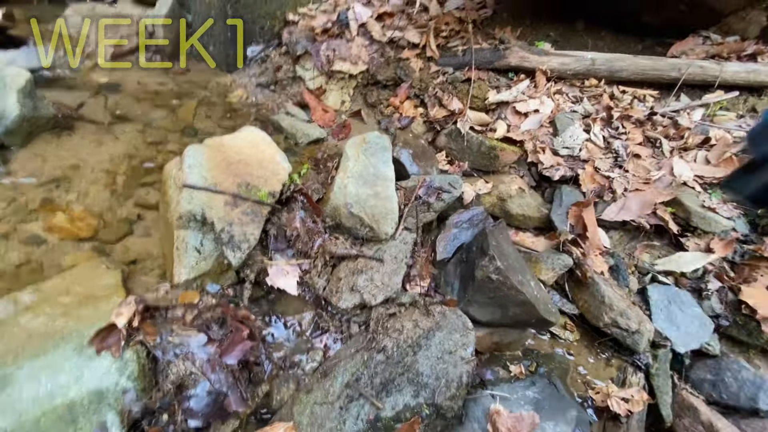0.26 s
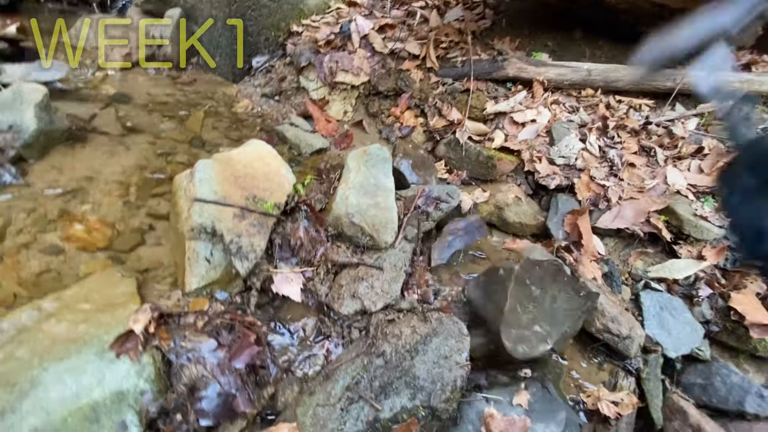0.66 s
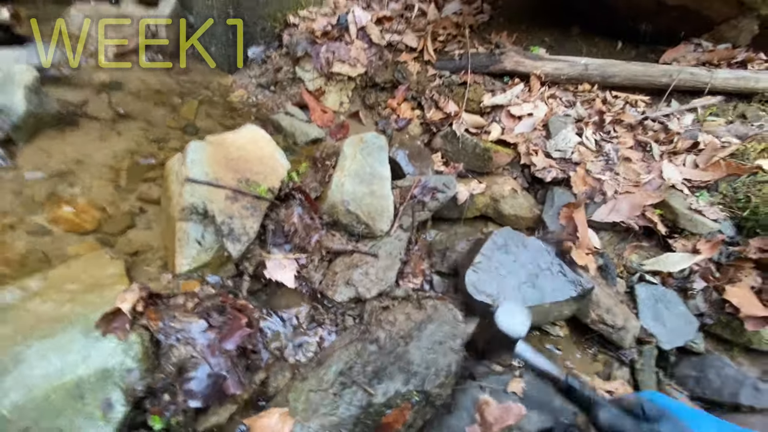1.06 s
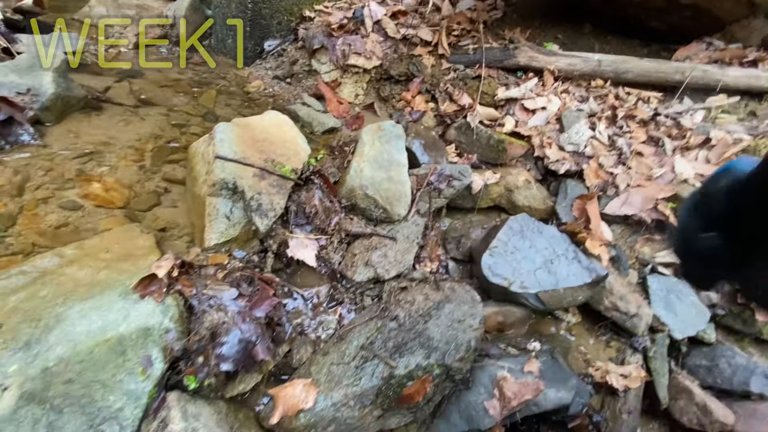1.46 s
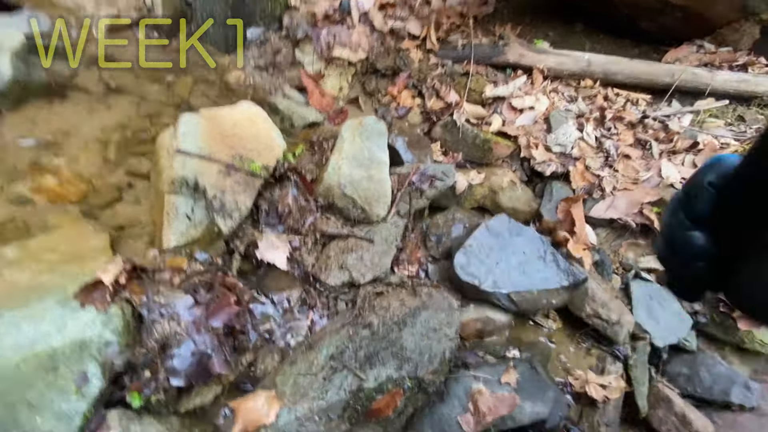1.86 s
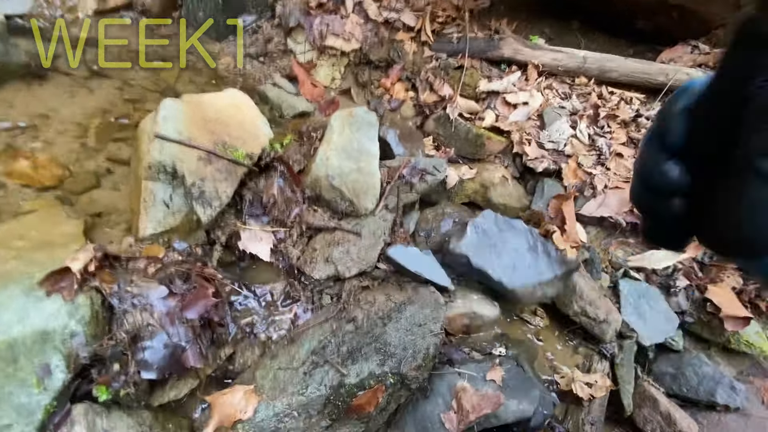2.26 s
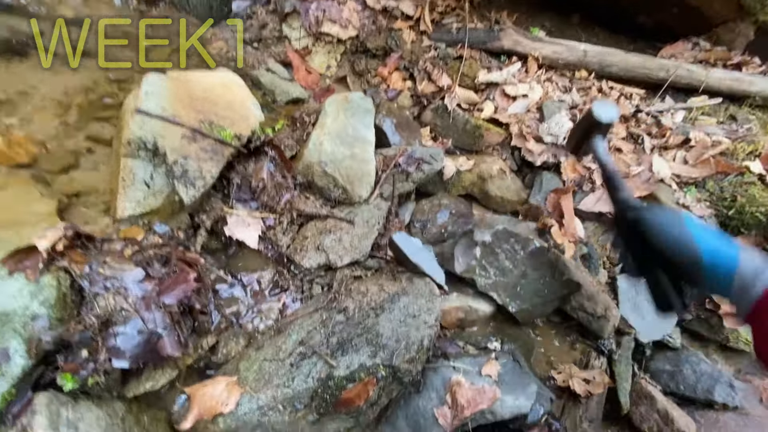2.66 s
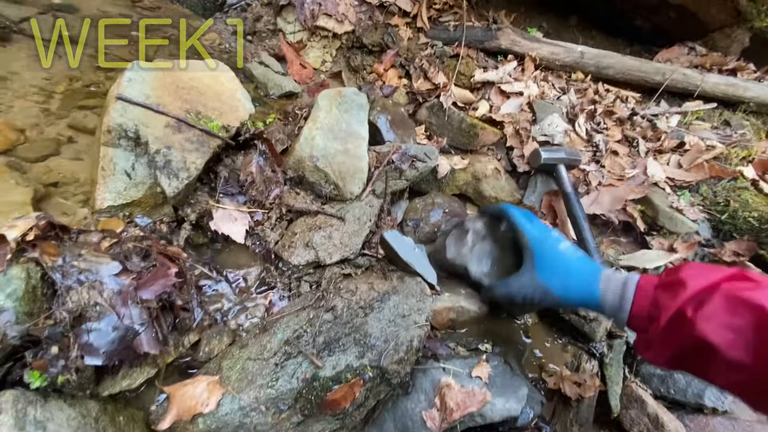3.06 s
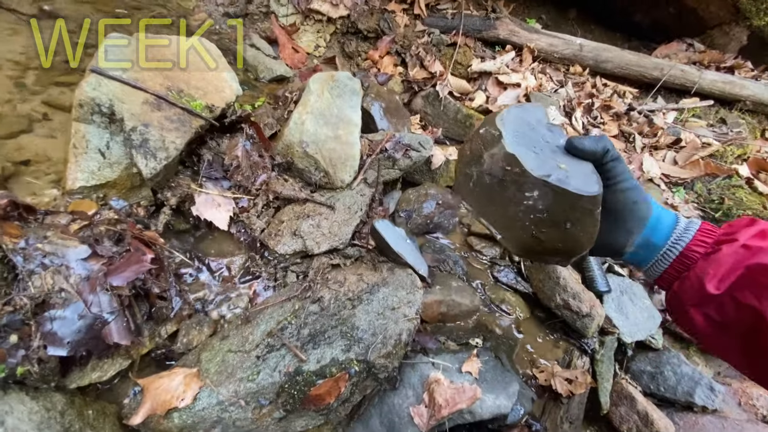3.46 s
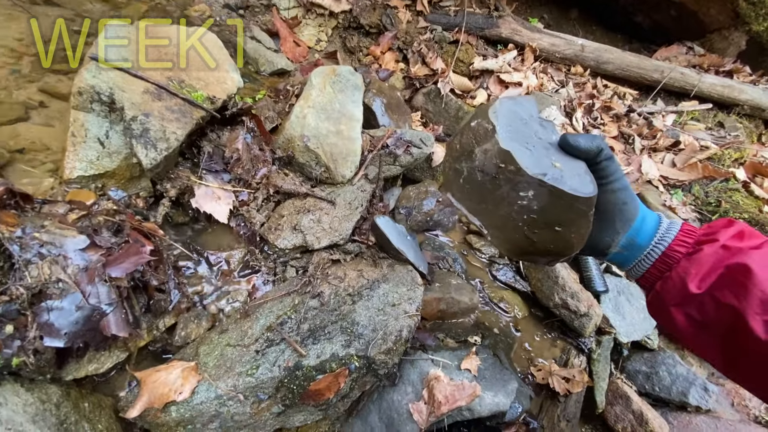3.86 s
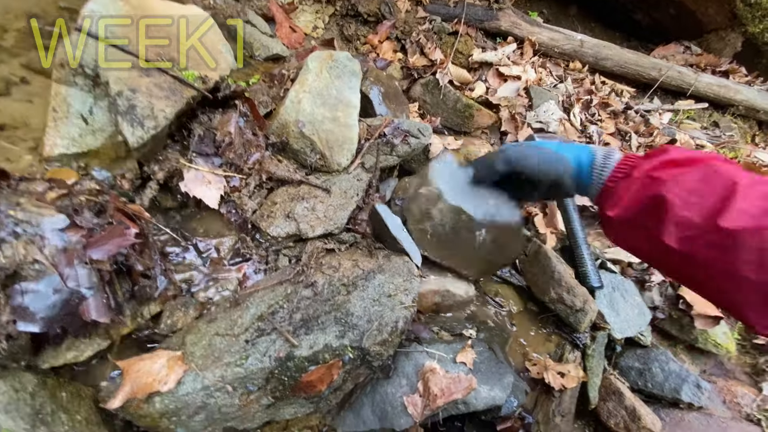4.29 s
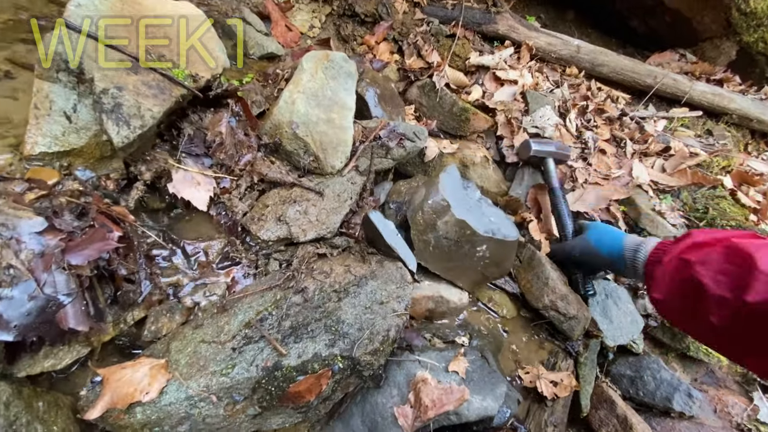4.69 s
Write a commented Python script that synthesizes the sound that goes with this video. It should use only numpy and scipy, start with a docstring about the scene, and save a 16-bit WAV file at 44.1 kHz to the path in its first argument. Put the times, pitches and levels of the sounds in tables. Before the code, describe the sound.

Close outdoor stereo recording of rock splitting: short, dry, distorted hammer cracks with brief steel ring, each followed by stone clacks and small chips rattling. A thin stream hisses and drips throughout, with soft low air rumble and rubbing on the microphone. Bright clinks follow the last blow, then a lull, then the heavy stone lands in a quick cluster of knocks.

```python
"""On the stony bank of a small stream, a steel hammer splits hard rocks close to a stereo microphone that overloads.
Blows are crushing noise through the block's resonances; knocks, clinks and the singing hammer are damped modes.
Grit and the snaps of some clinks are swells of spiky noise. The stream is patchy hiss with bubbles and drips,
tones whose pitch climbs. Low, lumpy noise makes the breeze and the rubs on the microphone; the bank answers
with a short noise tail."""
import sys
import numpy as np
from scipy import signal
from scipy.fft import rfft, irfft, next_fast_len
from scipy.io import wavfile
from scipy.ndimage import uniform_filter1d, map_coordinates

SR = 44100
rng = np.random.default_rng(int(sys.argv[2]) if len(sys.argv) > 2 else 0)


def unload_audio(sound):
    """Save the sound as a 16-bit wav file, at the path given as the first command line argument."""
    columns = np.transpose(np.atleast_2d(sound))
    # keep every value between -1 and 1, then stretch to whole-number steps
    steps = np.round(np.clip(columns, -1, 1) * 32767)
    wavfile.write(sys.argv[1], SR, steps.astype(np.int16))


def undo_db(level):
    """Turn decibels back into plain size, where 20 dB means ten times bigger."""
    steps = np.asarray(level, float) / 20
    return 10 ** steps


N = 213179  # length in samples

# Air buffeting the microphone ports: start_s, level_db
BREEZE_LEVEL = [(0, -59), (.5, -64), (1.7, -59.5), (3.1, -58.5), (4.1, -66.5), (4.4, -58), (4.83, -60.5)]
# A sleeve or strap drags on the microphone body: start_s, level_db, length_s
RUBS = [(1.411, -34.5, 0.069), (1.506, -39, 0.047), (2.97, -44, 0.045), (3.037, -46, 0.044),
        (3.065, -44.5, 0.023)]
# Colour of breeze and rubs: freq_hz, relative level_db
RUMBLE_COLOUR = [(21, -29), (35, -2.5), (102, -9), (134, -5.5), (168, -8), (323, -17.5), (400, -33),
                 (520, -66.5), (880, -120)]
LUMPS_DB = 3  # depth of the rumble's quick lumps

# Level of the trickle before its stirring and flutter: start_s, level_db
WATER_LEVEL = [(0, -49.5), (.2, -52), (.38, -46), (.9, -50), (1.5, -49.5), (2, -50), (2.3, -46),
               (2.45, -49), (2.8, -51.5), (3.3, -52.5), (3.7, -54), (4.1, -53), (4.28, -51), (4.83, -50.5)]
# Colour of the trickle's hiss: freq_hz, relative level_db
TRICKLE_COLOUR = [(150, -49), (250, -17.5), (413, -2), (694, -5), (885, -1.5), (1510, -3.5), (1900, -1.5),
                  (2330, -4), (2920, -2), (10900, -13), (15700, -20.5)]
# Likeness of left and right in the noise of water and air: freq_hz, likeness (0 to 1)
SIDE_LIKENESS = [(100, 0.07), (1000, 0.13), (8000, 0.033)]
# The side the water leans to: freq_hz, left_over_right_db
WATER_LEAN = [(60, -12), (180, -13), (550, 1.5), (1650, 4), (4970, 2.5), (15000, 1.5)]
# A jolt stirs water and gravel, mostly a swell, once a dip: start_s, change_db at its peak
STIRS = [(.4, 2), (1.03, 8), (1.601, 7), (2.02, -0.5), (2.51, 3.5), (2.85, 6), (4.33, 3)]
STIR_S = 0.054  # time to the peak of a change, which then settles
# The clearest drips: start_s, level_db, pitch_hz before the climb
DRIPS = [(0.067, -38, 1750), (0.2863, -37.5, 2370), (0.3306, -36, 2920), (1.512, -29, 3210),
         (2.2256, -32.5, 3430), (2.2952, -37, 3800), (3.2189, -38.5, 2540), (3.2987, -41, 7430),
         (3.7676, -33, 4380), (3.8138, -42, 3000), (3.9973, -36.5, 2010), (4.0466, -42.5, 1910),
         (4.219, -29, 3530), (4.6323, -35, 3620), (4.684, -36, 2700)]
DRIP_SIDE_DB, FAINT_DRIP_DB = 15, -40  # left over right of the dripping ledge; loudest chance drip

# Bursts of scattering grit, and the noisy snaps of the clinks at 1.03 and 2.06 s:
# start_s, level_db under the swell, length_s, tilt_db per octave
GRIT_BURSTS = [(0, -42, 0.13, -5.5), (0.403, -33.5, 0.094, -7.5), (0.799, -34, 0.022, -4.5),
               (1.032, -13.5, 0.0071, -12), (1.055, -26, 0.017, -4.5), (1.075, -28, 0.021, 0.5),
               (1.613, -25.5, 0.025, -6.5), (1.719, -27, 0.015, 1.5), (1.89, -43, 0.051, -1),
               (2.037, -37.5, 0.14, -3.5), (2.0585, -16, 0.0061, 1), (2.479, -25.5, 0.041, -5.5),
               (2.51, -23, 0.013, 10), (2.674, -45.5, 0.075, -1), (2.856, -39.5, 0.026, -30),
               (3.096, -42, 0.031, -6), (3.178, -36.5, 0.016, -3.8), (3.468, -50, .012, -1),
               (3.544, -43.5, .015, -4.5), (3.822, -45.5, 0.012, -3.5), (4.203, -46.5, 0.24, -3.5),
               (4.282, -28, 0.025, -6.5), (4.322, -23.5, .01, -9), (4.344, -30, .025, -13)]

# Flakes and hammer head touch stone: start_s, level_db, pitch_hz, t60_s, left_over_right_db
CLINKS = [(0.0557, -29.5, 4100, 0.031, 10), (.4618, -19, 3500, .02, 0), (0.7639, -28, 4500, 0.018, -4.5),
          (0.799, -30, 5200, 0.007, -0.5), (0.842, -35, 5400, 0.005, 21), (1.0495, -24, 3970, 0.0085, 10.5),
          (1.0563, -23, 1500, 0.025, -1.5), (1.0705, -22, 4250, 0.01, -4.5),
          (1.1072, -32.5, 4500, 0.0057, 1.5), (1.796, -25, 4730, 0.0058, -2.5),
          (2.0417, -7.5, 1740, 0.013, 7), (2.0444, -10.5, 3500, 0.017, 4.5), (2.0511, -9.5, 2070, 0.013, 9),
          (2.0585, -3.5, 3500, 0.012, -1.5), (2.072, -22, 1310, .03, -1), (2.167, -25, 1780, 0.017, -3),
          (2.4855, -19, 1650, 0.023, 2), (2.501, -20, 3500, 0.021, -2), (2.5097, -7.5, 1200, 0.02, 6),
          (2.5121, -6, 1522, 0.018, -1.5), (2.5301, -25, 3950, 0.013, 10), (2.8479, -11.5, 1488, 0.037, -7),
          (2.8555, -29.5, 1197, 0.056, 8), (2.9453, -29, 1280, 0.033, -7), (3.1792, -40.5, 911, 0.015, 12),
          (3.8961, -35.5, 2780, 0.023, 11), (4.2841, -18.5, 1500, 0.021, 1.5)]
# Modes of a flake: freq_hz, relative level_db
FLAKE_MODES = [(700, -7.5), (1150, 4.5), (1500, -3), (1850, 0), (2400, 1), (3000, -1), (3400, 1.5),
               (4200, 7.5), (4900, 10.5)]
SNAP_DB = -10.5  # snap of a clink under its ring
# The hammer head rings when it skids: start_s, level_db
SKIDS = [(2.0405, -11.5), (2.0505, -16.5), (2.0588, -8.5), (2.0862, -26.5)]
# Modes of the skidding steel: freq_hz, relative level_db, t60_s
STEEL_MODES = [(11150, 3, .025), (10370, -1, .03), (11180, 8, 0.016), (12960, -4.5, .02)]

# Low mode of the handle, then high mode of the head: freq_hz, t60_s
HAMMER_MODES = [(690, 0.087), (3280, 0.019)]
# Jolts that set the hammer singing: start_s, handle_db, head_db, ring_times (a loose hammer rings longer)
JOLTS = [(.995, -17.5, -41, 1.4), (1.0258, -38.5, -6, 1.1), (1.0302, -39.5, -4, .9),
         (1.605, -15.5, -38, 1.1), (2.025, -17, -41, .7), (2.483, -21, -46.5, .95), (2.514, -18, -45.5, .6),
         (2.848, -62, -15, 1.05), (2.876, -41.5, -52, 2.4)]

# The block knocks on its bed: start_s, level_db, strongest_hz, t60_s, upper_modes_db
KNOCKS = [(0.0211, -21.5, 425, 0.08, -49), (0.04, -14, 870, 0.016, -30), (0.054, -25, 990, 0.036, -16),
          (0.0863, -33.5, 600, 0.02, -23), (0.115, -37, 800, 0.018, -15), (0.4532, -4.5, 740, 0.014, -16.5),
          (0.5324, -17.5, 920, 0.024, 2), (0.5354, -2.5, 860, 0.03, -24), (.595, -24.5, 1120, 0.021, -15),
          (0.6239, -30, 1090, 0.032, -12), (.634, -30, 1180, 0.042, -16), (0.7368, -17.5, 990, 0.024, -15),
          (0.812, -28.5, 1130, 0.063, -9), (0.8179, -15.5, 1150, 0.023, -1), (0.895, -31, 1080, 0.015, -8),
          (1.1263, -16, 694, 0.018, -21), (1.6348, -8.5, 1040, 0.023, -8.5), (1.7618, 0, 783, 0.022, -25.5),
          (1.806, -29.5, 1300, 0.061, -17), (1.714, -34, 453, 0.02, -19), (2.127, -28.5, 450, 0.023, -16),
          (2.271, -35.5, 417, 0.019, -30), (2.339, -4, 640, 0.017, -18.5), (2.35, -24, 603, 0.011, -6),
          (2.374, -32, 888, 0.093, -6), (2.396, -28, 726, 0.04, -18), (2.544, -22, 590, 0.027, -12),
          (2.8711, -18, 860, 0.02, 3), (3.109, -36, 1090, 0.04, -21), (4.296, -21, 600, 0.057, -13),
          (4.325, -1, 1250, 0.012, -3), (4.3372, 8, 880, 0.016, -13), (4.4359, -6.5, 744, 0.021, -21.5)]
# Modes of the block resting on its bed: freq_hz, level_db, left_over_right_db, share of the knock's t60
BED_MODES = [(451, -3, 4.5, 1.5), (600, 1, 14, 1), (680.6, 3.5, -2.5, 0.98), (860, 9, -5, 0.69),
             (1007, 3.5, -19.5, 0.55), (1239, -4.5, -2, 1.52), (1587, 9, -0.5, 0.75), (2160, 3.5, 0.5, 0.8),
             (2640, 4.5, 3, 0.39), (3500, -2.5, -1.5, 0.42), (4350, -5, 12.5, 0.48)]
# A blow or the block's full weight pushes the ground: start_s, level_db
LANDINGS = [(0.116, -45), (.396, -19.5), (0.4526, -27), (0.537, -45), (0.7363, -46.5), (0.816, -40),
            (0.984, -21), (1.028, -23), (1.1255, -34), (1.595, -32), (2.016, -13), (2.8715, -30.5),
            (4.296, -34.5), (4.322, -19.5), (4.336, -14.5)]
KNOCK_CRACK_DB, KNOCK_PUSH_DB = -17, -32  # snap over the upper modes; push on the ground under any knock

# Hammer blows, and at 1.03 s a brief sharp clink of the head, each with its own favoured pitch:
# start_s, level_db, crush_s, treble_db, favoured_hz
BLOWS = [(0.3947, -0.5, 0.015, -21.5, 870), (0.9822, -3.5, 0.016, -20.5, 920),
         (1.0253, -7.5, 0.0012, -21.5, 1480), (1.0271, -7, 0.0049, -22.5, 833),
         (1.5940, -1.5, .014, -18.5, 1290), (2.013, -2, 0.014, -11.5, 1430)]
# Resonances of the struck block: freq_hz, width_hz, level_db
BLOCK_MODES = [(180, 47, -12), (448, 40, -6), (600, 110, -1), (668, 260, 2), (870, 470, 2.5),
               (1060, 256, 2.5), (1290, 72, 2), (1600, 110, -2.5), (1921, 160, -5.5), (2370, 600, -10),
               (3019, 65, -4), (3337, 93, -9), (3830, 1000, -10.5), (4640, 4500, -19)]
RISE_SHARE, QUICKENS_DB = .1, 1.3  # rise over crush length; dB by which it shortens per dB of treble

# Answer of the stony bank: freq_hz, t60_s
BANK_DECAY = [(200, 0.037), (1000, 0.085), (4000, 0.19), (12000, 0.16)]

T = np.arange(SR // 5) / SR  # clock of one event, s


def unit(x):
    """Scale to rms 1."""
    return x / np.sqrt(np.mean(x ** 2) + 1e-20)


def along(points, hz):
    """Read (freq_hz, value) points on a log frequency axis."""
    f, v = np.transpose(points)
    return np.interp(np.log(hz + 1), np.log(f + 1), v)


def curve(rows):
    """Draw (start_s, value) rows as one value per sample."""
    return np.interp(np.arange(N) / SR, *np.transpose(rows))


def wobble(rate):
    """A smooth random curve with rate knots a second."""
    knots = rng.standard_normal(int(N * rate / SR) + 4)
    return map_coordinates(knots, [np.arange(N) * rate / SR])


def filtered(x, response):
    """Shape x with a complex response of frequency."""
    m = next_fast_len(x.shape[-1] + 8192)
    return irfft(rfft(x, m) * response(np.fft.rfftfreq(m, 1 / SR)), m)[..., :x.shape[-1]]


def sides(left_over_right_db):
    """Left and right gains as a column."""
    return undo_db(np.array([.5, -.5])[:, None] * left_over_right_db)


def add(track, start_s, sound):
    """Mix a sound into a stereo track at start_s."""
    part = track[:, round(start_s * SR):][:, :sound.shape[1]]
    part += sound[:, :part.shape[1]]


def noise(count, alike):
    """Left and right noises that share a part."""
    a, b = rng.standard_normal((2, count))
    turn = np.arccos(np.clip(alike, -1, 1)) / 2
    mid, side = np.cos(turn) * a, np.sin(turn) * b
    return np.array([mid + side, mid - side])


def treble(x, edge_hz, tilt_db):
    """High-pass with a tilt per octave and a soft top, rms 1."""
    def response(f):
        high_pass = (1j * f / (edge_hz + 1j * f)) ** 2
        tilt = undo_db(tilt_db * np.log2(f / 8000 + 0.058))
        return high_pass * tilt / (1 + (f / 14000) ** 6)
    return unit(filtered(x, response))


def ring(hz, level, t60, attack_s):
    """Sum of damped modes with the mid at peak 1; level has one row a side."""
    decay = undo_db(-60 * T / np.asarray(t60)[:, None])
    modes = np.sin(2 * np.pi * np.outer(hz, T)) * decay * (1 - np.exp(-T / attack_s))
    sound = level @ modes
    return sound / np.abs(sound.mean(0)).max()


def crack(t60):
    """A short bright snap: noise that dies away at once."""
    return undo_db(-60 * T / t60) * treble(noise(len(T), 0.88), 5800, -13)


def rush(spectrum, patchy_db):
    """Stereo noise of rms 1 with patches of random gain over time and frequency."""
    z = signal.stft(rng.standard_normal((2, N)), nperseg=512)[2]
    field = uniform_filter1d(rng.standard_normal(z.shape[1:]), size=24, axis=0)
    field = uniform_filter1d(field, size=2, axis=1)
    pair = signal.istft(z * undo_db(patchy_db * unit(field)), nperseg=512)[1][:, :N]

    def response(hz):
        turn = np.arccos(np.clip(along(SIDE_LIKENESS, hz), -1, 1)) / 2
        return undo_db(along(spectrum, hz)) * [np.cos(turn), np.sin(turn)]
    mid, side = filtered(pair, response)
    return unit(np.array([mid + side, mid - side]))


def breeze():
    """Air moving over the microphone ports, and lumpy rubs on the body: both swell one low noise."""
    level = undo_db(curve(BREEZE_LEVEL))[None] * np.ones((2, 1))
    for start_s, level_db, length_s in RUBS:
        swell = (1 - np.exp(-T / 0.042)) * np.exp(-(T / length_s) ** 3)
        add(level, start_s, undo_db(level_db) * swell[None])
    return level * unit(undo_db(LUMPS_DB * wobble(35)) * rush(RUMBLE_COLOUR, patchy_db=1.0))


def stirred():
    """Change in dB of the water's level, mostly a swell, that peaks and settles after each jolt."""
    start_s, change_db = np.transpose(STIRS)
    age = np.clip(np.arange(N) / SR - start_s[:, None], 0, None) / STIR_S
    return change_db @ (age * np.exp(1 - age))


def bubble(hz, cycles, climb):
    """A damped tone whose pitch climbs as it dies."""
    life_s = cycles / hz
    t = T[:len(T) // 4]
    tone = np.sin(2 * np.pi * hz * (t + climb * t * t / life_s / 2))
    return tone * np.exp(-t / life_s) * (1 - np.exp(-t / (0.37 * life_s)))


def stream():
    """A trickle of finely crackling hiss with small chance bubbles, and a few clear drips."""
    bubbles = np.zeros((2, N))
    for when, pitch, size, pan in rng.random((300, 4)):
        gain = undo_db(-7.5 - 1.9 * np.log(size + 0.0033)) * sides(16 * (pan - .5))
        add(bubbles, when * N / SR, gain * bubble(700 * undo_db(22 * pitch), 2.1, 0.033))
    for when, pitch, size, pan in rng.random((400, 4)):  # spray bursts in tiny bright ticks
        gain = undo_db(5.5 - 1.5 * np.log(size + 0.022)) * sides(12 * (pan - .5))
        add(bubbles, when * N / SR, gain * bubble(4500 * undo_db(9.5 * pitch), 8.8, .05))
    slosh_db = .7 * wobble(10)
    crackle_db = 2.5 + 2.27 * wobble(70) + 0.5 * wobble(600)
    hiss = undo_db(crackle_db) * rush(TRICKLE_COLOUR, patchy_db=2.0)
    water = undo_db(curve(WATER_LEVEL) + stirred() + slosh_db) * (hiss + bubbles)
    water = filtered(water, lambda f: sides(along(WATER_LEAN, f)))
    faint = [(when * N / SR, FAINT_DRIP_DB - 6 * size, 1400 * undo_db(9 * pitch))
             for when, size, pitch in rng.random((8, 3))]
    for start_s, level_db, pitch_hz in DRIPS + faint:
        add(water, start_s, undo_db(level_db) * sides(DRIP_SIDE_DB) * bubble(pitch_hz, 10.2, 0.041))
    return water


def grit():
    """Chips and sand rattle over the stones, and two clinks snap: spiky noise under a quick swell."""
    out = np.zeros((2, N))
    for start_s, level_db, length_s, tilt_db in GRIT_BURSTS:
        swell = (1 - np.exp(-T / 0.001)) * np.exp(-(T / length_s) ** 2.3)
        spikes_db = 4.7 * uniform_filter1d(rng.standard_normal(len(T)), size=30) * np.sqrt(30)
        rattle = treble(undo_db(spikes_db) * noise(len(T), 0.067), 540, tilt_db)
        add(out, start_s, undo_db(level_db) * swell * rattle)
    return out


def clinks():
    """Hard, light contacts ring the modes near the strongest one, with a snap; skids ring the steel."""
    out = np.zeros((2, N))
    flake_hz, flake_db = np.transpose(FLAKE_MODES)
    for start_s, level_db, pitch_hz, t60, pan_db in CLINKS:
        detuned_hz = flake_hz * (1 + .03 * rng.standard_normal(len(flake_hz)))
        all_hz = np.append(detuned_hz, pitch_hz)
        near_db = np.append(flake_db - 4 - 9 * np.abs(np.log2(flake_hz / pitch_hz)), 0)
        level = undo_db(near_db + rng.normal(0, 1.0, (2, len(all_hz))))
        body = ring(all_hz, level, t60 * (pitch_hz / all_hz) ** 0.4, .0003)  # high modes die sooner
        snap = undo_db(SNAP_DB) * crack(2.27 * t60)
        add(out, start_s, undo_db(level_db) * sides(pan_db) * (body + snap))
    steel_hz, steel_db, t60 = np.transpose(STEEL_MODES)
    for start_s, level_db in SKIDS:
        add(out, start_s, undo_db(level_db) * sides(3) * ring(steel_hz, undo_db(steel_db)[None], t60, 0.00021))
    return out


def handle():
    """Each jolt rings the hammer's two modes, handle and head."""
    out = np.zeros((2, N))
    for start_s, *levels_db, ring_times in JOLTS:
        for level_db, (hz, t60) in zip(levels_db, HAMMER_MODES):
            add(out, start_s, undo_db(level_db) * ring([hz], sides(1.5), [t60 * ring_times], 0.00075))
    return out


def knocks():
    """Soft, heavy contacts ring low modes near the strongest one; harder contacts wake the upper modes."""
    out, ground = np.zeros((2, 2, N))
    hz, mode_db, side_db, share = np.transpose(BED_MODES)
    thump = ring([130, 230], np.array([[.7, 1], [.7, 1.4]]), [.05, .04], 0.00087)  # the ground is pushed
    for start_s, level_db, strongest_hz, t60, upper_db in KNOCKS:
        # a knock that rings longer is also purer
        low_db = -450 * t60 * np.abs(np.log2(hz / strongest_hz))
        colour_db = mode_db + np.where(hz < 1500, low_db, upper_db)
        level = undo_db(colour_db + rng.normal(0, 0.55, len(hz))) * sides(side_db)
        body = ring(hz, level, t60 * share, 0.0016)
        snap = undo_db(upper_db + KNOCK_CRACK_DB) * crack(0.027)
        add(out, start_s, -undo_db(level_db) * (body + snap))
        add(ground, start_s, undo_db(level_db + KNOCK_PUSH_DB) * thump)
    for start_s, level_db in LANDINGS:
        add(ground, start_s, undo_db(level_db) * thump)
    return ground + filtered(out, lambda f: (1j * f / (230 + 1j * f)) ** 3)  # a small stone radiates little bass


def block_body(f):
    """Response of the struck block: resonances of alternating sign."""
    total = 0
    for k, (hz, width_hz, level_db) in enumerate(BLOCK_MODES):
        damping = 1j * f * width_hz
        total = total + (-1) ** k * undo_db(level_db) * damping / (hz * hz - f * f + damping)
    return total


def blows():
    """Crushing noise of some milliseconds, shorter for the head's clink, drives the block's resonances."""
    out = np.zeros((2, N))
    for start_s, level_db, crush_s, treble_db, favoured_hz in BLOWS:
        rise_s = RISE_SHARE * crush_s * undo_db(-QUICKENS_DB * (treble_db + 17))  # a brighter hit starts quicker
        rise = 1 - np.exp(-(T / rise_s) ** 0.84)
        hold = 1 / (1 + np.exp(np.clip((T - crush_s) / 0.0011, -50, 50)))
        tail = undo_db(-23.5 - 60 * T / 0.21)
        first_contact = 1 + 3.1 * np.exp(-T / 0.00051)  # the hardest moment
        crush = rise * (hold + tail) * first_contact

        def response(f):
            # a harder hit favours the high resonances
            bright = undo_db(0.39 * (treble_db + 19.0) * np.log2(1 + f / 1500))
            # resonances near the favoured pitch gain most
            favour = 1j * f * 0.25 * favoured_hz / (favoured_hz ** 2 - f * f + 1j * f * 0.26 * favoured_hz)
            return block_body(f) * bright * (1 + 1.1 * favour)
        body = filtered(crush * noise(len(T), 0.14), response)
        body = body / np.sqrt(np.mean(body[:, :round((crush_s + .003) * SR)] ** 2))  # rms 1 while crushing
        snap = undo_db(treble_db) * crush * treble(noise(len(T), 0.061), 2100, -2.5)
        add(out, start_s, undo_db(level_db) * (body + snap))
    return out


def bank(x):
    """The stony bank answers with a noise tail in which each frequency dies at its own speed."""
    hz, t, z = signal.stft(rng.standard_normal((2, SR // 4)), SR, nperseg=256)
    decay = undo_db(-60 * t / along(BANK_DECAY, hz)[:, None])
    tail = signal.istft(z * decay, SR, nperseg=256)[1]
    late = np.pad(x, ((0, 0), (150, 0)))  # samples until the answer starts
    return signal.fftconvolve(late, tail / np.linalg.norm(tail[0]), axes=1)[:, :N]


def scene():
    """Stone and steel with the bank's answer, over grit, water and air."""
    stone = blows() + knocks() + clinks() + handle()
    # the left port hears the stones a moment (s) sooner
    stone = filtered(stone, lambda f: np.exp(-2j * np.pi * f * np.array([[0], [.00006]])))
    return stone + undo_db(-16.5) * bank(stone) + grit() + stream() + breeze()


def low_pass(x):
    """Removes everything above the highest recorded frequency."""
    return signal.sosfilt(signal.butter(12, 15820, fs=SR, output="sos"), x)


def record(dry):
    """The microphone input overloads: peaks bend smoothly into full scale."""
    clipped = dry / (1 + np.abs(dry) ** 8) ** (1 / 8)
    return low_pass(clipped)


dry = scene()
out = record(dry)
unload_audio(out)
```